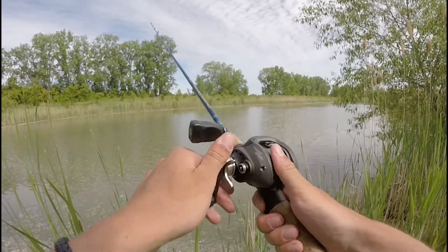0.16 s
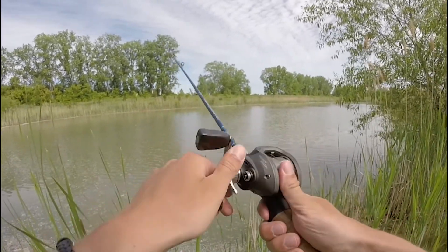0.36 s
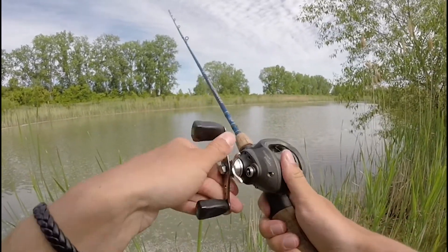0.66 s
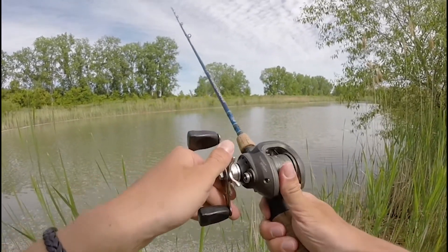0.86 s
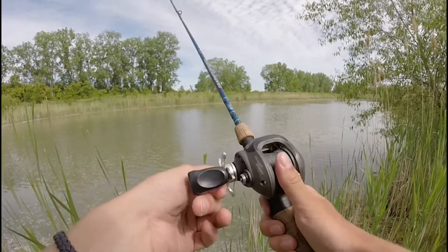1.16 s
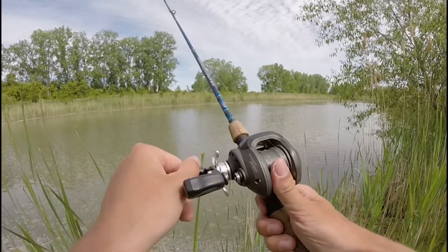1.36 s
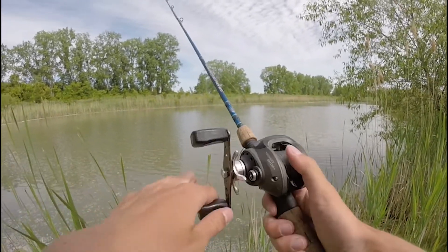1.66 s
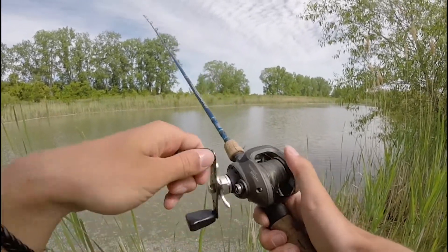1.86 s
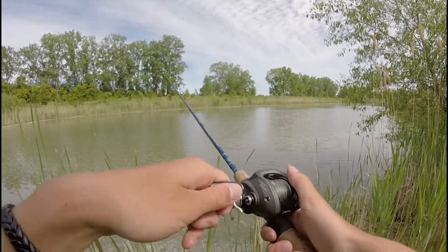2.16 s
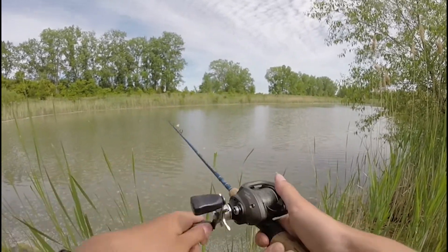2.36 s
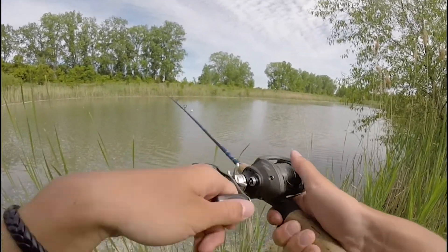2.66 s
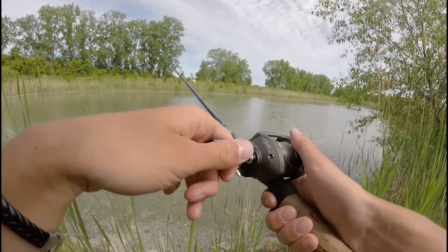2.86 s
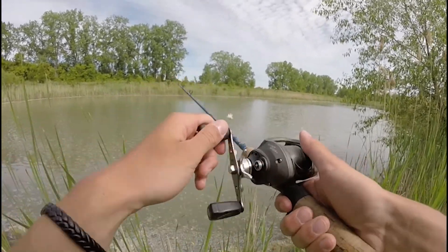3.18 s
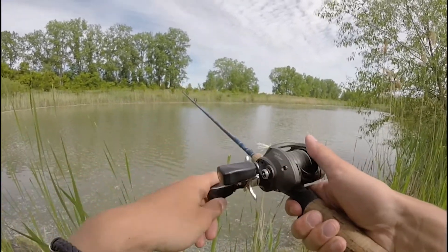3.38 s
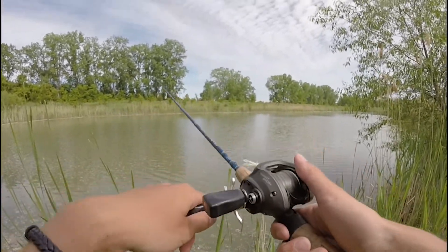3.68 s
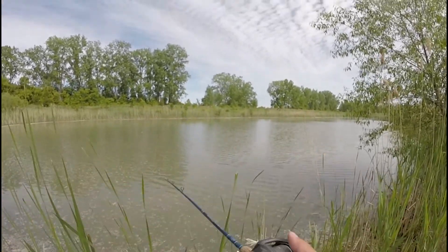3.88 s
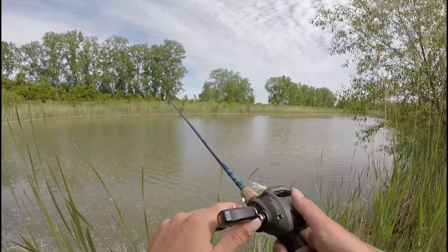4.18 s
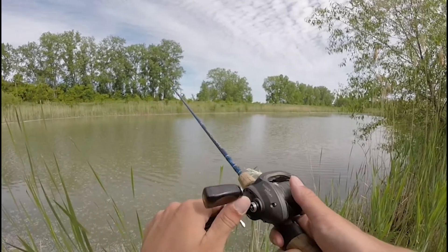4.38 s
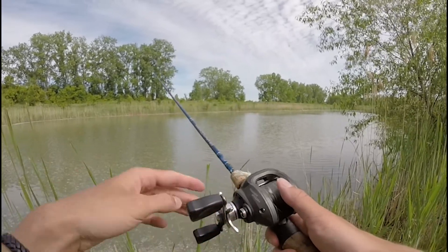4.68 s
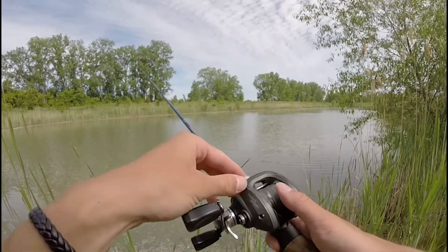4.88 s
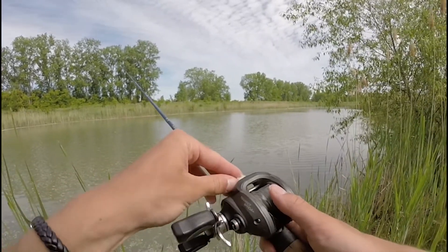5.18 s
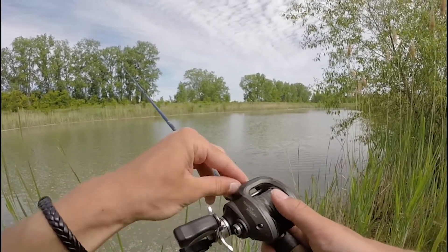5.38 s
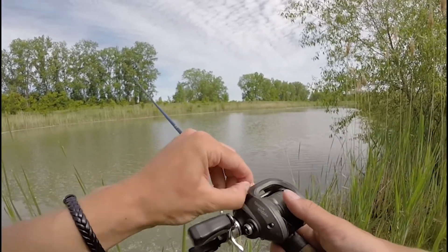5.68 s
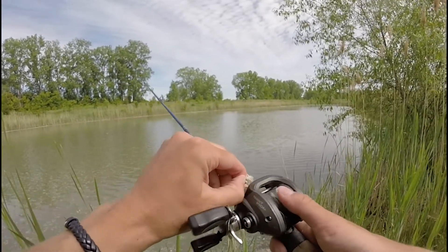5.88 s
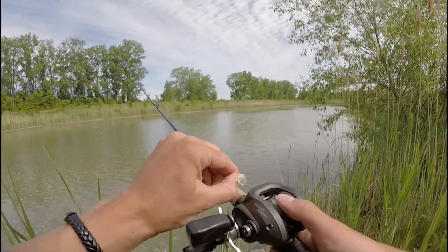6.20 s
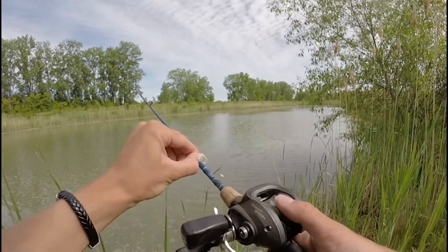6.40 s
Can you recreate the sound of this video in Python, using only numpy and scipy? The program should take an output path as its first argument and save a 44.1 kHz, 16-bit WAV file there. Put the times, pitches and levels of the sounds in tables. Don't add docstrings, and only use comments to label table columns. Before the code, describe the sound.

A close fishing reel slips and knocks harshly, whirrs and jams, leaving faint clicks, two tiny squeaks and a quiet pond-side hush with birds.

```python
import sys
import numpy as np
from scipy import signal
from scipy.fft import rfft, irfft
from scipy.io import wavfile
from scipy.ndimage import uniform_filter1d

SR = 44100
rng = np.random.default_rng(int(sys.argv[2]) if len(sys.argv) > 2 else 0)


def ratio_of_db(decibels):
    return 10 ** (np.asarray(decibels, float) / 20)


def int16_out(signal):
    q = np.round(np.clip(np.atleast_2d(signal).T, -1, 1) * 32767)
    wavfile.write(sys.argv[1], SR, q.astype(np.int16))


N = 288458
T = np.arange(N) / SR


def unit(x):
    return x / np.sqrt(np.mean(x ** 2))


def walk(rate_hz):
    hold = int(SR / rate_hz)
    steps = np.repeat(rng.standard_normal(N // hold + 1), hold)
    slewed = uniform_filter1d(uniform_filter1d(steps, hold), hold)
    return unit(slewed[:N])


def ring(force, modes, damp=1):
    out = 0
    for k, (hz, db, t60_s) in enumerate(modes):
        decay = np.log(1000) * damp / (max(t60_s, .002) * SR)
        pole = np.exp(2j * np.pi * hz / SR - decay)
        out = out + (-1) ** k * ratio_of_db(db) * signal.lfilter([1], [1, -pole], force).imag
    return out


# pitch_hz, level_db (per Hz)
AIR_COLOUR = [(20, -3), (60, -3), (130, -5), (330, -10.5), (760, -8), (1000, -14.5), (1250, -21),
              (1750, -26), (2600, -22), (3300, -27.5), (4200, -31.5), (9000, -45), (12500, -50),
              (15400, -54)]


def air(swell_db=0.43, flicker_db=1.0, level_db=-46):
    f = np.arange(N // 2 + 1) * SR / N + 1
    hz, db = np.transpose(AIR_COLOUR)
    colour = ratio_of_db(np.interp(np.log(f), np.log(hz), db, right=-90))
    spectrum = rfft(rng.standard_normal(N)) * colour
    swell, out = walk(1.3), 0
    for octave in np.arange(4, 15):
        share = np.clip(1 - np.abs(np.log2(f) - octave), 0, 1)
        out = out + irfft(spectrum * share, N) * ratio_of_db(swell_db * swell + flicker_db * walk(17))
    insects = unit(ring(rng.standard_normal(N), [(10350, 0, 0.01)])) * ratio_of_db(-84 + 3.0 * walk(15))
    return unit(out) * ratio_of_db(level_db) + insects


# pitch_hz, level_db, t60_s
ROD = [(400, -11, .02), (560, -8, .02), (720, 0, .02), (985, 0, .015), (1300, -3, .012)]
FRAME = [(1650, -6, .006), (2050, -2, .006), (2410, 1, .009), (2800, -2, .009), (2870, -21, .035),
         (3290, -5, .006), (3700, -12, .005)]
PLATE = [(4300, -8, .005), (4650, -1, .006), (4960, -1, .011), (5030, -19, .05), (5400, -8, .006),
         (5740, -6, .007), (6100, -7, .007), (6600, -9, .006), (7050, -10, .008), (7600, -12, .006)]
SPRING = [(8300, -3, .004), (9000, -6, .004), (9700, -3, .004), (10400, -5, .005), (11200, -9, .004),
          (12050, -6, .004), (12800, -3, .004), (13750, -3, .005), (14700, -9, .003), (15800, -12, .003)]
# pitch_hz, level_db, t60_s
SPOOL = [(7040, 0, .02)]
# time_s, gear_db
CREEP = [(0, -65), (.2, -74), (.5, -65), (1.01, -65), (1.12, -50), (1.25, -93), (1.42, -65), (1.6, -57),
         (1.7, -59)]
# time_s, gear_db
TURNS = [
    [(1.73, -63), (1.77, -54.5), (1.9, -53), (2.05, -49.5), (2.18, -46.5), (2.23, -55.5), (2.376, -51),
     (2.53, -62.5), (2.75, -66)],
    [(3.1, -81.5), (3.278, -49.5), (3.322, -53.5), (3.424, -75), (3.48, -72)],
]
# centre_s, half_length_s, level_db
SQUEALS = [
    (1.998, .005, -56.5),
    (2.038, .006, -61),
    (2.058, .012, -63),
    (2.115, 0.0064, -58),
    (2.15, .022, -59),
]


def crank(flutter_db=2.3, tooth_db=1, rod_db=1.5, spring_db=-19, squeal_db=-26):
    roughness = ratio_of_db(1.4 * rng.exponential(size=N) + flutter_db * walk(160))
    grains = rng.standard_normal((3, N)) * roughness
    gear = unit(ring(grains[0], FRAME, damp=1.9) + ratio_of_db(-7) * ring(grains[0], PLATE, damp=2.4))
    teeth = unit(ring(grains[0], [(2950, 0, .006)]))
    gear = unit(gear + ratio_of_db(tooth_db) * teeth)
    rod = unit(ring(grains[1], ROD))
    spring = unit(ring(grains[2], SPRING, damp=3))
    squeal = unit(ring(grains[2] * ratio_of_db(2.5 * walk(90)), SPOOL, damp=1.6))
    mix = gear + ratio_of_db(rod_db) * rod + ratio_of_db(squeal_db) * squeal + ratio_of_db(spring_db) * spring
    out = 0
    for s, half_s, db in SQUEALS:
        out = out + ratio_of_db(db) * np.exp(-((T - s) / half_s) ** 4) * squeal
    for turn in [CREEP, *TURNS]:
        s, db = np.transpose(turn)
        moving = np.interp(T, [s[0] - .03, s[0], s[-1], s[-1] + .03], [0, 1, 1, 0])
        out = out + moving * ratio_of_db(np.interp(T, s, db)) * mix
    return out


# start_s, frame_db, rod_db, plate_db (parts relative to frame)
TICKS = [(.002, -48, -7, -0.5), (.11, -42, -9, -11), (.138, -41, -13, -13), (.365, -42, -5, -15),
         (.4302, -40, -5, -7), (.5217, -38.5, -8, -11), (.7758, -40, -9, -6), (.8065, -58, 19, 0),
         (.8874, -43, -4, -7), (1.0209, -39, 0, -10), (1.0246, -31, 1.5, -5), (1.0415, -32, -16, -12),
         (1.0668, -29.5, 7, -5), (1.1113, -41, -4, -12), (1.1229, -49, -1, 7), (1.3393, -44.5, 6, 1),
         (1.471, -33, 1, 2), (1.4752, -32, 2, -6), (1.5394, -38, -5, 7), (1.5544, -34, 0, 0),
         (1.5956, -41, 2, -4), (1.6267, -39, -16.5, -9), (1.67, -37.5, 1.5, -2), (1.7043, -34, -2.5, -4),
         (1.7166, -39, 0, -4), (1.7848, -37, 0, -9), (2.0121, -34, 2, -18), (2.1116, -40, -7, -18),
         (2.2461, -37.5, -7, 6), (2.2571, -37, -8, -1)]
# start_s, frame_db, rod_db, plate_db, spring_db (parts relative to frame)
JERKS = [
    (.146, -14.5, -6, -9.5, -13),
    (0.1517, -15, 1.5, -0.5, -8.5),
    (1.0536, -23.5, 0.5, -6, -10),
    (1.06, -15.5, -9, -8, -10),
    (1.0728, -6, -6, -11, -15.5),
    (1.5722, -25, -5, -8.5, -14),
    (1.6466, -7, -8, 2.5, 0),
]
# start_s, frame_db, rod_db, plate_db, spring_db (parts relative to frame)
SLIPS = [
    (0.3979, -12.5, -13.5, -5.5, -11),
    (0.6054, -14.5, -3.5, -8, -7.5),
    (0.853, -13, -10, -6.5, -11),
    (1.3865, -18, -9, -5, -9.5),
]
# offset_ms, level_db, rod_db, spring_db (all relative to the slip)
CATCHES = [
    (-9, -27, 3, 3),
    (-4.5, -23, 16, -6),
    (-1.1, -10, 1, -2),
]
# offset_ms, level_db, rod_db, spring_db (all relative to the slip)
SLIP_BOUNCES = [
    (1.8, -4, 2, -6),
    (4, -15.5, 1, -4),
    (7.8, -20, 7.5, -6),
]
# offset_ms, level_db, rod_db, spring_db (all relative to the jerk)
JERK_BOUNCES = [
    (3, -12.5, 0, -8),
    (6.2, -19, 5.5, -13),
    (10.5, -19.5, 2.5, -16),
]
# start_s, frame_db, rod_db, plate_db, spring_db (parts relative to frame)
FINGERS = [(3.291, -39, -14, -9, -20), (3.3134, -37.5, -6, -6, -16), (3.342, -43, -4, -11, -22),
           (3.4115, -48, 1, -11, -7), (4.0977, -45, 3, -3, -7), (4.1425, -35, 0, 2, -11.5),
           (4.96, -59, 8, 4, 4), (4.975, -49, 9, 0, 5), (4.983, -49, 5, 0, -4),
           (4.9956, -41.5, 3, -1.5, -12), (5.0042, -43, 9, -15, -10), (5.6201, -55, 5, 2, -3),
           (5.6956, -39, 8.5, 1, -1), (5.708, -39, -13, 0, -0.5), (5.7947, -58, 14, 3, 6),
           (5.8148, -57, 7, -4, 2), (5.8345, -61, 10, 6, 10), (5.8716, -61, 9, 4, 4),
           (5.9179, -51.5, 5, -2, 0)]


def blows():
    scatter_ms, scatter_db = .3, 1.5
    rows = [[*slip, 0.71] for slip in SLIPS] + [[*jerk, 0.5] for jerk in JERKS]
    for table, extras in ((SLIPS, CATCHES + SLIP_BOUNCES), (JERKS, JERK_BOUNCES)):
        for s, db, rod_db, plate_db, spring_db in table:
            luck = rng.standard_normal((len(extras), 2))
            for (ms, d_db, d_rod, d_spring), (late, hard) in zip(extras, luck):
                start = s + (ms + scatter_ms * late) / 1000
                level = db + d_db + scatter_db * hard
                rows.append([start, level, rod_db + d_rod, plate_db, spring_db + d_spring, 1.1])
    light = [[*tick, 0.6] for tick in TICKS]
    for k, (late, hard) in enumerate(rng.standard_normal((7, 2))):
        start = 1.0765 + (k * 2.1 + scatter_ms * late) / 1000
        light.append([start, -21.5 - 0.05 * k + scatter_db * hard, 1.5, -8, 0.78])
    for s, db, rod_db, plate_db, ms in light:
        spring_db = -8.5 + 0.47 * plate_db
        rows.append([s, db, rod_db, plate_db, spring_db, ms])
    return rows + [[*finger, 1.53] for finger in FINGERS]


def even(bursts, size=17):
    spectrum = rfft(bursts)
    colour = np.sqrt(uniform_filter1d(np.abs(spectrum) ** 2, size))
    return irfft(spectrum / colour)[:, :1280]


def struck(modes, damp, age, tilt_db, scatter_db=1.8, detune=.012):
    hz, db, t60_s = (column[:, None] for column in np.transpose(modes))
    chance = rng.standard_normal((len(damp), 2, len(modes), 1))
    sign = (-1) ** np.arange(len(modes))[:, None]
    wave = np.sin(2 * np.pi * hz * (1 + detune * chance[:, 0]) * age)
    fade = np.exp(-np.log(1000) * damp[:, None, None] * age / np.maximum(t60_s, .002))
    tilt = tilt_db[:, None, None] * np.log2(hz / hz[0])
    return np.sum(sign * ratio_of_db(db + scatter_db * chance[:, 1] + tilt) * wave * fade, axis=1)


def snaps(rattle_db=-24, rattle_s=.005, rise=.45, jammed_s=2.5):
    s, db, rod_db, plate_db, spring_db, ms = np.transpose(blows())
    age = np.arange(1536) / SR
    span = rise * np.maximum(ms, .2)[:, None] / 1000
    force = age / span * np.exp(1 - age / span) + ratio_of_db(rattle_db) * np.exp(-age / rattle_s)
    damp = np.where(s > jammed_s, 2, 1)
    soft = -10.0 * (s > jammed_s)
    bright = .6 * np.maximum(db + 22, 0)
    parts = ((FRAME, 0, -1.1, 0 * soft), (ROD, rod_db, -1.2, 0 * soft),
             (PLATE, plate_db, -1.3, soft), (SPRING, spring_db, -1.4, bright + soft))
    sound = 0
    for modes, rel_db, trim_db, tilt_db in parts:
        grit = even(force * rng.standard_normal(force.shape))
        part = signal.fftconvolve(grit, struck(modes, damp, age, tilt_db), axes=1)
        edges = [.76 * modes[0][0], 1.2 * modes[-1][0]]
        part = signal.sosfilt(signal.butter(2, edges, "band", fs=SR, output="sos"), part)
        part = part / np.abs(part).max(axis=1, keepdims=True)
        sound = sound + part * ratio_of_db(db + rel_db + trim_db)[:, None]
    out = np.zeros(N + sound.shape[1])
    for start, blow in zip(s, sound):
        i = int(start * SR)
        out[i:i + len(blow)] += blow
    return out[:N]


# start_s, length_s, start_hz, end_hz, level_db
BIRDS = [(.04, .03, 5700, 5100, -69), (.065, .025, 4600, 4000, -63), (.19, .022, 4050, 4480, -64),
         (0.21, .025, 4450, 4150, -66), (.43, .022, 5600, 5100, -65), (.46, .03, 5000, 5250, -68),
         (0.612, .03, 5650, 5050, -62), (.69, .045, 5100, 4500, -68), (.825, .025, 5250, 5650, -62),
         (.93, .045, 4200, 5200, -65), (4.467, .01, 6600, 6600, -61), (6.125, .051, 7370, 7290, -75),
         (6.185, .05, 7340, 7480, -71), (6.279, 0.058, 3350, 3460, -59), (6.348, .013, 4220, 4220, -65),
         (6.413, 0.029, 5330, 5150, -60), (6.481, 0.056, 3410, 3470, -57.5)]
# start_s, length_s, start_hz, end_hz, level_db
SONG = [
    (1.86, .08, 2590, 2780, -62),
    (2.254, 0.12, 2630, 2960, -54),
    (2.487, .05, 3320, 3430, -59),
    (2.61, .065, 2800, 2900, -58),
    (2.685, .025, 2730, 2850, -60),
    (2.762, 0.041, 2650, 2850, -59),
    (2.81, 0.036, 3500, 3120, -63),
    (2.845, .05, 3100, 3000, -64),
]


def birds():
    out, waver = np.zeros(N), ratio_of_db(2.5 * walk(120))
    for s, length_s, hz0, hz1, db in BIRDS + SONG:
        i = int(s * SR)
        u = np.linspace(0, 1, int(length_s * SR))[:N - i]
        phase = 2 * np.pi * np.cumsum(hz0 + (hz1 - hz0) * u) / SR
        out[i:i + len(u)] += ratio_of_db(db) * np.sqrt(2 * np.sin(np.pi * u)) * np.sin(phase)
    return out * waver


# centre_s, pitch_hz, half_length_s, level_db
JOLTS = [
    (.156, 150, 0.0035, -29),
    (.155, 330, .003, -36),
    (.396, 480, .002, -38),
    (.612, 200, .0041, -36),
    (.609, 430, .003, -33),
    (.855, 420, .003, -35),
    (1.078, 132, .0031, -32.5),
    (1.077, 300, .003, -34),
    (1.65, 332, 0.0035, -37),
]
# centre_s, pitch_hz, half_length_s, level_db
DRIP = (1.9385, 545, .0035, -28)


def hollow_blips():
    out = 0
    for s, hz, half_s, db in JOLTS + [DRIP]:
        swell = np.exp(-((T - s) / half_s) ** 2 / 2)
        out = out + ratio_of_db(db) * swell * np.sin(2 * np.pi * hz * (T - s))
    return out


# time_s, pitch_hz, level_db
LOW_SQUEAK = [(4.29, 3300, -77), (4.294, 3450, -49), (4.298, 3760, -59), (4.312, 3780, -57),
              (4.328, 3600, -51.5), (4.337, 3650, -77)]
HIGH_SQUEAK = [(4.412, 4100, -70), (4.418, 4500, -46), (4.424, 5100, -54), (4.429, 5800, -60),
               (4.435, 6600, -44.5), (4.448, 7200, -48), (4.455, 7440, -50), (4.463, 6100, -57),
               (4.47, 4700, -58)]
# multiple, level_db
LOW_TONES = [(1, -6), (2, 0), (3, -9), (4, -20)]
HIGH_TONES = [(1, 0), (2, -26)]


def squeak(track, tones, rub_db=-23):
    s, hz, db = np.transpose(track)
    pitch = np.interp(T, s, hz) * (1 + .008 * walk(500))
    phase = 2 * np.pi * np.cumsum(pitch) / SR
    tone = sum(ratio_of_db(tone_db + 2.5 * walk(300)) * np.sin(k * phase) for k, tone_db in tones)
    rub = ratio_of_db(rub_db) * unit(np.diff(rng.standard_normal(N + 1)))
    grip = ratio_of_db(np.interp(T, s, db, left=-200, right=-200))
    return grip * (np.sqrt(2) * tone + rub)


def scene():
    line = squeak(LOW_SQUEAK, LOW_TONES) + squeak(HIGH_SQUEAK, HIGH_TONES)
    return (air() + crank() + snaps() + birds() + hollow_blips() + line)[None]


def top_cut(x):
    return signal.sosfilt(signal.butter(12, 16660, fs=SR, output="sos"), x)


def record(dry):
    cut = signal.sosfilt(signal.ellip(6, .5, 22, 15200, fs=SR, output="sos"), dry)
    return top_cut(cut)


dry = scene()
out = record(dry)
int16_out(out)
```